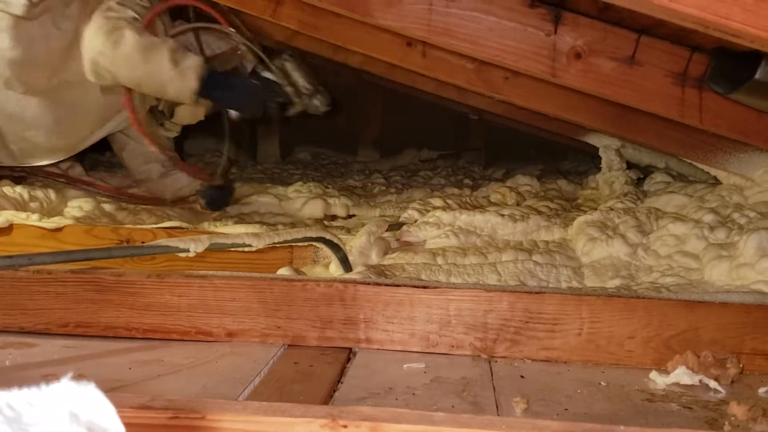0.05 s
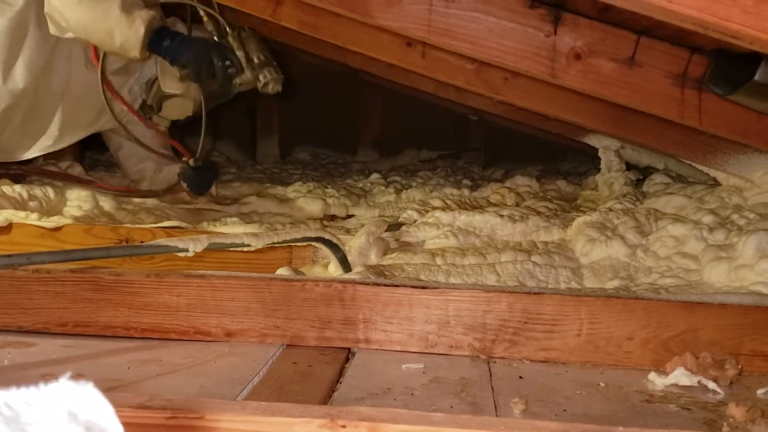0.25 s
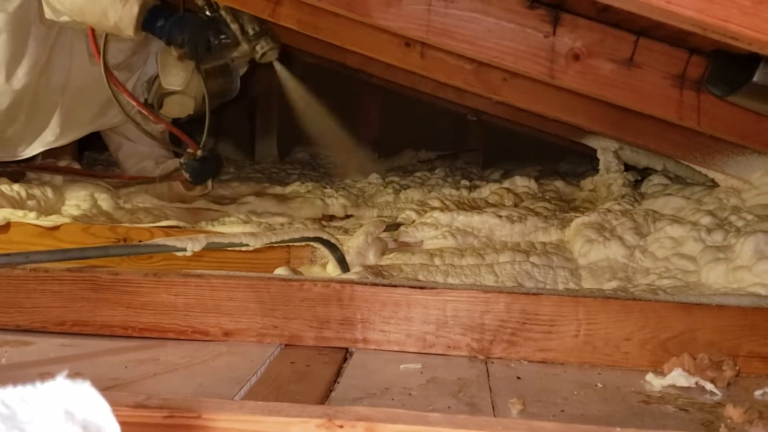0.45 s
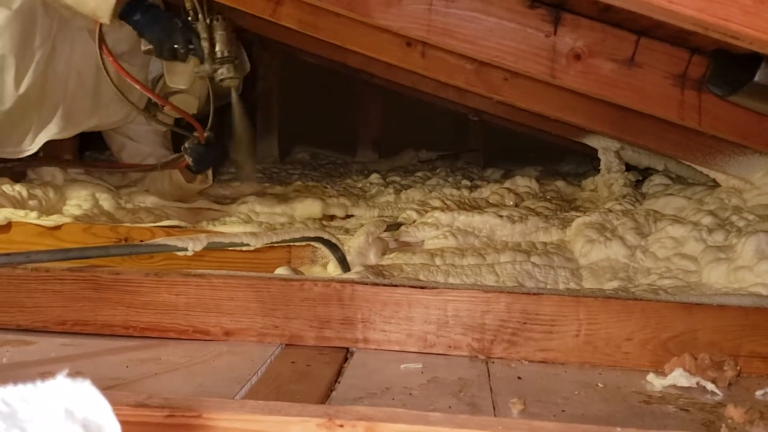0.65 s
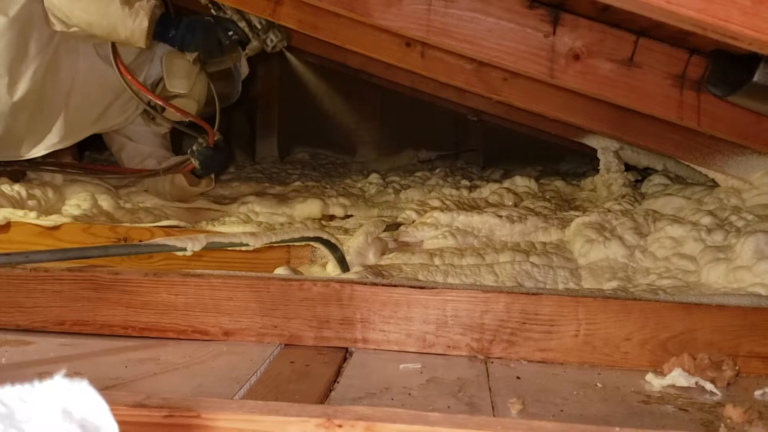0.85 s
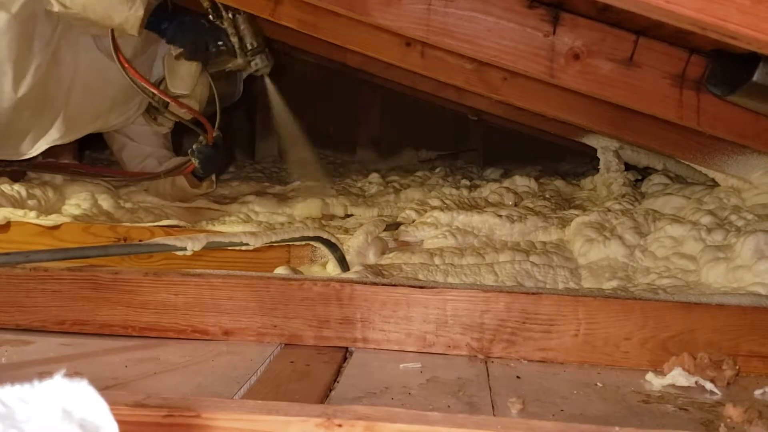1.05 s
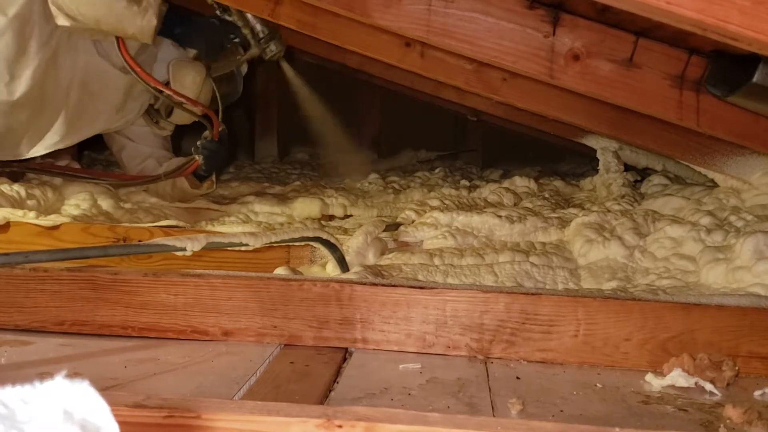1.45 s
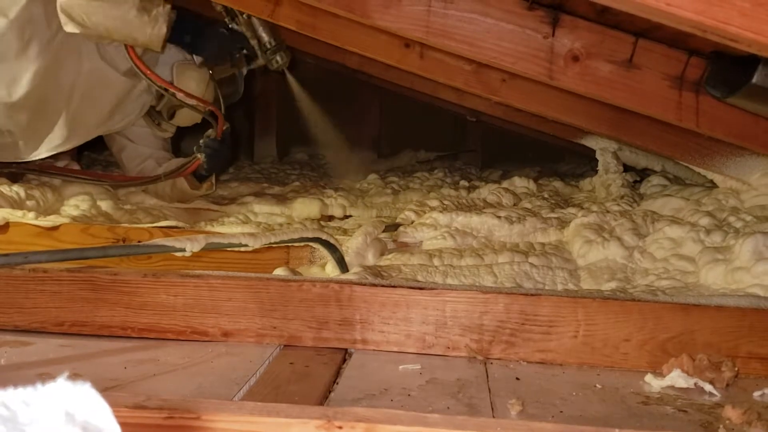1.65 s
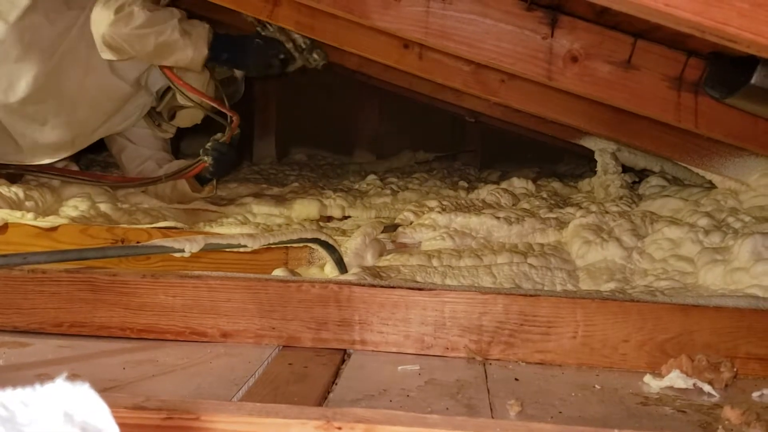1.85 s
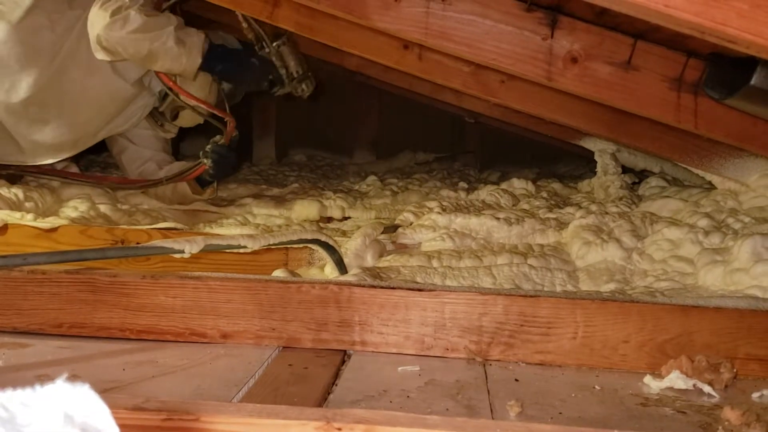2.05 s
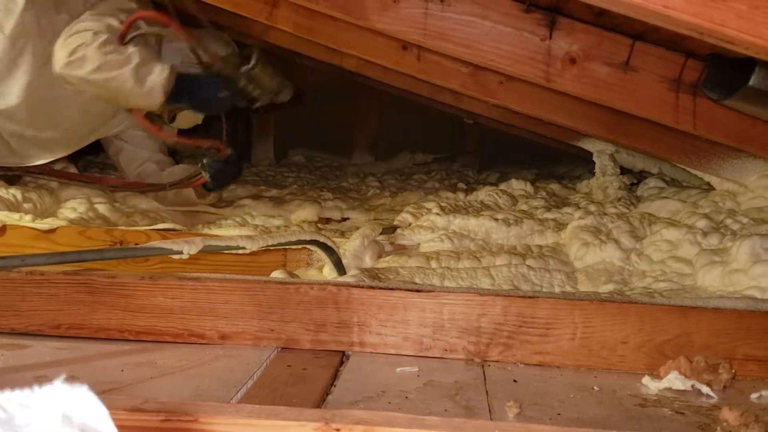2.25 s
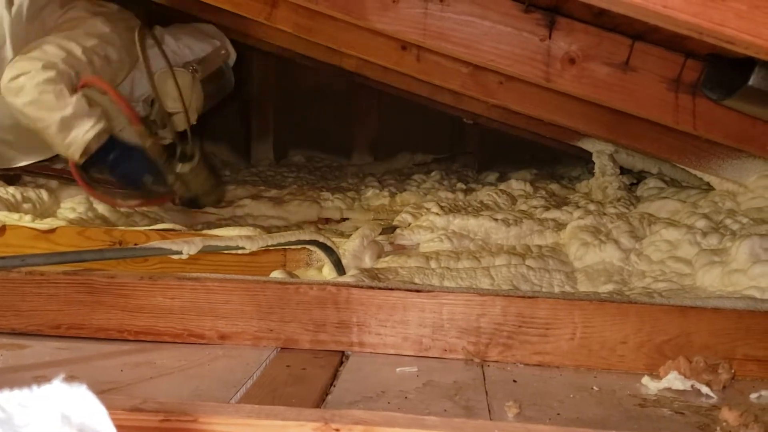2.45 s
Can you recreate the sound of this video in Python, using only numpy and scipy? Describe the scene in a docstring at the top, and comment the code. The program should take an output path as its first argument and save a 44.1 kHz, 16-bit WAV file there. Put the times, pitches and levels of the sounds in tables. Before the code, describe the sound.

A foam spray gun leaks a soft hiss of air in a cramped attic, then sprays for about two seconds with a loud, sharp, pulsing hiss, light spatter and low rumble, before dropping back to soft air.

```python
"""Purge air hisses from a spray gun in a low wooden attic, over dull room noise and a faint mains hum.
Then the trigger is pulled and the gun lays insulation foam. The pump feeds the jet in surges, a short
and a long one about five times a second: the jet hisses, the nozzle rings, foam spatters and the blast
rumbles on the floor. The surges stop and the purge air is heard again."""
import sys
import numpy as np
from scipy import signal
from scipy.fft import rfft, irfft
from scipy.io import wavfile

SR = 44100
rng = np.random.default_rng(int(sys.argv[2]) if len(sys.argv) > 2 else 0)


def wrap_up_sound(samples):
    """Save the sound to the file named by the first command line argument, as 16-bit audio."""
    columns = np.atleast_2d(samples).T
    # keep every value between -1 and 1, then stretch to whole-number steps
    tamed = np.clip(columns, -1, 1)
    steps = np.round(tamed * 32767).astype(np.int16)
    wavfile.write(sys.argv[1], SR, steps)


N = 110250
T, F = np.arange(N) / SR, np.fft.rfftfreq(N, 1 / SR)


def amp(db):
    """Decibels to gain."""
    return 10 ** (np.asarray(db) / 20)


def spectrum(points, column=1):
    """One table column, interpolated over log frequency."""
    table = np.array(points)
    return np.interp(np.log(F + 1), np.log(table[:, 0] + 1), table[:, column])


def stereo(points):
    """Left and right gains of a spectrum table."""
    return amp([spectrum(points, column=1), spectrum(points, column=2)])


# Stereo coherence: f/Hz, left-right correlation
COHERENCE = [(20, 0.9), (170, 0.96), (350, .74), (700, 0.68), (1400, 0), (3000, 0), (16000, 0)]

def noise(gain):
    """Stereo noise of a given spectral density, nearly mono in the bass."""
    left, independent = rfft(rng.standard_normal((2, N)))
    shared = spectrum(COHERENCE)
    right = shared * left + np.sqrt(1 - shared ** 2) * independent
    return irfft(np.array([left, right]) * gain, N) * np.sqrt(SR / 2)


def wobble(rate_hz):
    """Low-passed random motion, unit variance."""
    x = irfft(rfft(rng.standard_normal(N)) / (1 + (F / rate_hz) ** 4), N)
    return (x - x.mean()) / x.std()


def peak(hz, width_hz):
    """Gain of a steep-sided resonance."""
    return 1 / (1 + ((F - hz) / (width_hz * np.pi / 4)) ** 2)


def split(x, hz):
    """Bands below and above a crossover."""
    low = irfft(rfft(x) / (1 + (F / hz) ** 8), N)
    return low, x - low


def burst(at_s, half_s, hz, width_hz, db):
    """Gaussian swell of narrowband noise."""
    return noise(peak(hz, width_hz) * amp(db)) * np.exp(-.5 * ((T - at_s) / half_s) ** 2)


def crossfade(k, positions):
    """Equal-power window for gun position k."""
    return np.cos(np.pi / 2 * np.clip(T / T[-1] * (positions - 1) - k, -1, 1))


def attic(x, positions=12, t60_s=0.087, wet_db=-1.5, echoes_per_s=2000):
    """Close rafters comb the hiss; the echo pattern shifts as the gun moves."""
    t, echoes = np.arange(SR // 8) / SR, np.zeros((2, N))
    for k in range(positions):
        taps = rng.choice([-1., 1.], (2, len(t))) * (rng.random((2, len(t))) < echoes_per_s / SR)
        taps *= amp(-60 * t / t60_s)
        taps /= np.linalg.norm(taps, axis=1, keepdims=True)
        echoes += signal.fftconvolve(x * crossfade(k, positions), taps, axes=1)[:, :N]
    return (x + amp(wet_db) * echoes) / np.hypot(1, amp(wet_db))


def boards(x, positions=15, count=4, spread_s=0.010, echo_db=-15):
    """Early echoes off the nearest boards cut notches, alike in both channels, that move with the gun."""
    echoes = np.zeros((2, N))
    for k in range(positions):
        direct = x * crossfade(k, positions)
        for when, polarity in rng.random((count, 2)):
            lag = int((.001 + when * spread_s) * SR)
            echoes[:, lag:] += np.sign(polarity - .5) * direct[:, :N - lag]
    return (x + amp(echo_db) * echoes) / np.sqrt(1 + count * amp(echo_db) ** 2)


def tone(hz, db):
    """Sine wavering in level and phase."""
    level = np.sqrt(2) * amp(db + 1.7 * wobble(rate_hz=8.2))
    return level * np.sin(2 * np.pi * hz * T + 0.14 * wobble(rate_hz=5))


# Room noise: f/Hz, density/(dB re 1 Hz)
ROOM_SPECTRUM = [(20, -93), (45, -88), (110, -88), (190, -83.5), (260, -96), (400, -99.5), (800, -108),
                 (3000, -125)]
# Room noise gain: t/s, level/dB
ROOM_ENVELOPE = [(0, -2), (.25, 9), (.45, 8.5), (2.32, 13.5), (2.42, -9.5), (2.5, 12)]
# Mains hum: f/Hz, level/dB
HUM_LINES = [(59.5, -54.5), (183, -78)]

def background(drone_start_s=0.46, drone_rise_s=0.21):
    """Dull room noise, mains hum and a low drone that builds as spraying starts."""
    drone = tone(hz=44.8, db=-51.5) * np.clip((T - drone_start_s) / drone_rise_s, 0, 1)
    room = noise(amp(spectrum(ROOM_SPECTRUM))) * amp(np.interp(T, *np.transpose(ROOM_ENVELOPE)))
    return room + sum(tone(*line) for line in HUM_LINES) + drone


def handling_bump():
    """One faint, dull bump from handling."""
    return burst(at_s=.235, half_s=.022, hz=305, width_hz=45, db=-68)


# Purge air: f/Hz, left and right density/(dB re 1 Hz)
AIR_SPECTRUM = [(250, -120, -100), (507, -91, -95), (875, -90, -96), (1590, -88.5, -89.5),
                (2300, -82.5, -85), (3200, -76.5, -79.5), (3740, -79, -82.5), (4580, -75.5, -77.5),
                (5900, -75, -79), (6850, -72, -71.5), (8700, -75.5, -75.5), (9900, -73.5, -71.5),
                (11600, -73, -61.5), (13300, -72, -63.5), (15400, -64, -63.5)]
# Purge air gain: t/s, low-band level/dB, high-band level/dB
AIR_ENVELOPE = [(0, -10, -6), (.13, -8, -6.5), (.24, -3, -2), (.33, -1, -2), (.44, -3, -2), (.7, 2, -20),
                (2.28, -7.5, -10.5), (2.4, -10, -8), (2.5, -7.5, -9)]

def purge_air():
    """Air leaves the nozzle all the time and swells as the gun turns."""
    times_s, low_db, high_db = np.transpose(AIR_ENVELOPE)
    low, high = split(noise(stereo(AIR_SPECTRUM)), hz=5560)
    return low * amp(np.interp(T, times_s, low_db)) + high * amp(np.interp(T, times_s, high_db))


# Pump surges: t/s, length/s, rise/s, level/dB, sag/dB, ring trim/dB, spatter trim/dB, rumble trim/dB
PUMP_SURGES = [(0.437, 0.15, 0.0058, 0.0, 2, 0.5, -4.5, -2.5), (0.501, 0.082, 0.0018, 3.0, 5.5, -5, 2.5, 1),
               (0.596, 0.045, 0.0076, 6.5, 4.5, 0, -2, 2.3), (0.659, 0.136, 0.0095, 4.5, 8, -3, 2.5, -2.5),
               (0.799, 0.045, 0.01, 5, 3.5, -0.5, -2, 2), (0.858, 0.13, 0.012, 3.5, 8.5, -1.5, 1.2, -0.5),
               (0.979, 0.048, 0.012, 4.5, 3.5, -2, 1.5, 1.5),
               (1.039, 0.14, 0.0099, 1.5, 5, -0.5, -1.1, 0.5),
               (1.166, 0.042, 0.012, 3.5, 1.5, -1.5, 5.5, 2.5), (1.23, 0.13, 0.0083, 3, 9.5, 0.7, 1.5, -3),
               (1.341, 0.055, 0.011, 5, 6.5, -0.5, 2.5, 2.5), (1.395, 0.15, 0.019, 2, 8, 0, 2, -1.1),
               (1.521, 0.042, 0.0065, 2.3, 3, 0.5, 0.5, 3.5), (1.585, 0.16, 0.0082, 2, 8, 0, -1.0, -5),
               (1.685, 0.042, 0.0071, 3, 1.0, -0.5, 0, 1.2), (1.739, 0.12, 0.014, 3.5, 7, 0.2, 1, 0),
               (1.854, 0.038, 0.011, 5.4, 5.5, 0.7, 1, 1), (1.93, 0.14, 0.0088, 1.05, 4.5, -0.8, -1.2, -4),
               (2.032, 0.033, 0.0073, 3.5, 1, 2, 2, 0), (2.105, 0.12, 0.008, 0.2, 2.5, 7, 4, -1.3),
               (2.201, 0.036, 0.0076, 5, 4, 1.8, -1.5, -2.6)]
RING_TRIM_DB, SPATTER_TRIM_DB, RUMBLE_TRIM_DB = np.transpose(PUMP_SURGES)[5:]

def pump_flow(trim_db, release_db_per_s=600, extra_sag_db=0, depth=1):
    """Flow envelope: each surge rises, sags and dies away; the strongest one rules."""
    flow = np.zeros(N)
    trims_db = np.broadcast_to(trim_db, len(PUMP_SURGES))
    for (start_s, length_s, rise_s, db, sag_db, *_), trim in zip(PUMP_SURGES, trims_db):
        t = T - start_s
        level_db = trim + depth * (db - (sag_db + extra_sag_db) * np.clip(t / length_s, 0, 1))
        release_db = release_db_per_s * np.maximum(t - length_s, 0)
        flow = np.maximum(flow, np.clip(t / rise_s, 0, 1) * amp(level_db - release_db))
    return flow


# Floor rumble: f/Hz, density/(dB re 1 Hz)
RUMBLE_SPECTRUM = [(20, -94), (42, -64.5), (65, -66), (90, -62), (140, -72.5), (190, -65.5), (260, -75.5),
                   (400, -96.5), (900, -115)]

def blast():
    """The jet buffets the floor."""
    flow = pump_flow(RUMBLE_TRIM_DB, release_db_per_s=88)
    return noise(amp(spectrum(RUMBLE_SPECTRUM))) * flow * amp([[.3], [-.4]])


# Foam landing: f/Hz, density/(dB re 1 Hz)
SPATTER_SPECTRUM = [(150, -81), (300, -85.5), (400, -75), (500, -79.5), (620, -72), (800, -79.5),
                    (1000, -78), (1250, -95), (1500, -78), (2200, -134)]
# Foam spit: f/Hz, density/(dB re 1 Hz)
SPIT_SPECTRUM = [(40, -82), (100, -58), (200, -68), (290, -69), (390, -64), (520, -64.5), (800, -87),
                 (1400, -80.5), (2500, -83)]
# Spit onsets: t/s, level/dB
SPIT_EVENTS = [(0.441, 3), (0.557, -2), (0.595, 3), (.806, -3), (0.869, 2.5), (1.238, 4), (1.586, -4),
               (1.939, 2.5), (2.112, -0.5)]

def foam(spit_rise_s=0.0029, spit_decay_s=0.015):
    """Wet foam spatters on the floor in lumps and spits when the flow restarts."""
    flow = pump_flow(SPATTER_TRIM_DB, release_db_per_s=273, depth=0.25)
    lumps = amp(3.4 * wobble(rate_hz=23))
    spatter = noise(amp(spectrum(SPATTER_SPECTRUM))) * flow * lumps
    spit_level = np.zeros(N)
    for start_s, db in SPIT_EVENTS:
        decay = np.exp(-np.maximum(T - start_s - spit_rise_s, 0) / spit_decay_s)
        spit_level += amp(db) * np.clip((T - start_s) / spit_rise_s, 0, 1) * decay
    spits = noise(amp(spectrum(SPIT_SPECTRUM))) * spit_level
    return (spatter + spits) * amp([[.7], [-1.7]])


# Nozzle resonances: f/Hz, width/Hz, left and right density/(dB re 1 Hz)
NOZZLE_MODES = [(2297, 285, -59, -64.5), (3580, 445, -65.5, -63.5), (5130, 430, -62, -66.5)]
# Sputters: centre t/s, half length/s, f/Hz, width/Hz, density/(dB re 1 Hz)
NOZZLE_SPUTTERS = [(0.547, 0.014, 2070, 357, -51.5), (1.538, 0.0065, 2290, 220, -59),
                   (1.692, 0.0077, 2350, 216, -50)]

def nozzle(max_trim_db=2, flutter_db=2.1):
    """Turbulence rings the nozzle unevenly, with a few louder sputters."""
    # keeps the ring from standing out in the last surges
    ring_db = np.minimum(RING_TRIM_DB, max_trim_db)
    lowest = pump_flow(ring_db, depth=0.27)
    upper = pump_flow(ring_db * 0.59, extra_sag_db=-1.5)
    sound = sum(burst(*sputter) for sputter in NOZZLE_SPUTTERS) * amp([[0], [-4]])
    for k, (hz, width_hz, left_db, right_db) in enumerate(NOZZLE_MODES):
        ring = noise(peak(hz, width_hz) * amp([[left_db], [right_db]]))
        sound += ring * (upper if k else lowest) * amp(flutter_db * wobble(rate_hz=145))
    return sound


def turbulence(x, patch_hz=440, patch_s=0.037, depth_db=1.48):
    """Turbulence lifts and drops patches of the spectrum."""
    hz, t, frames = signal.stft(x, SR, nperseg=512, noverlap=384)
    field = rng.standard_normal(frames.shape)
    for axis, bins in (1, patch_hz / hz[1]), (2, patch_s / t[1]):
        kernel = np.exp(-.5 * (np.arange(-40, 41) / (bins / 2)) ** 2)
        field = signal.fftconvolve(field, np.expand_dims(kernel, (0, 3 - axis)), "same", axes=axis)
    frames *= amp(depth_db * field / field.std())
    return signal.istft(frames, SR, nperseg=512, noverlap=384)[1][:, :N]


# Jet hiss: f/Hz, left and right density/(dB re 1 Hz)
JET_SPECTRUM = [(600, -100, -100), (1300, -86.5, -80.5), (1740, -81, -82), (2920, -72.5, -81.5),
                (3300, -62, -84), (4160, -63, -68), (6100, -63.5, -63.5), (6450, -58.5, -61),
                (7240, -61, -62), (8240, -63.5, -62), (8850, -68, -67.5), (9900, -62.5, -65),
                (10360, -66.5, -60.5), (12100, -59.5, -53), (13150, -69, -55), (13600, -62, -59),
                (14300, -61, -52.5), (14650, -56, -57.5)]

def jet(early_decay_s=0.72, flutter_db=0.88):
    """Atomising hiss, with extra early on while pressure is high; the body sags more than the fizz."""
    body, fizz = split(noise(stereo(JET_SPECTRUM)), hz=8700)
    since_trigger_s = np.maximum(T - PUMP_SURGES[0][0], 0)
    early = noise(amp(-63) * peak(hz=8800, width_hz=2800) ** 2) * np.exp(-since_trigger_s / early_decay_s)
    hiss = body * pump_flow(trim_db=1.47, extra_sag_db=3.5) + (fizz + early) * pump_flow(trim_db=0)
    return hiss * amp(flutter_db * wobble(rate_hz=49))


def scene():
    """The gun with its echoes, plus floor sounds, background and a bump."""
    gun = turbulence(jet() + nozzle()) + purge_air()
    return attic(boards(gun)) + foam() + blast() + background() + handling_bump()


def record(dry):
    """Steep low-pass at 15.83 kHz."""
    lowpass = signal.firwin(601, 15830, window=("kaiser", 8), fs=SR)
    return signal.oaconvolve(dry, lowpass[None], "same")


dry = scene()
out = record(dry)
wrap_up_sound(out)
```